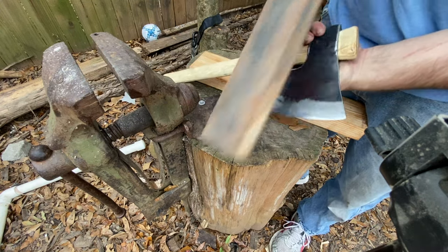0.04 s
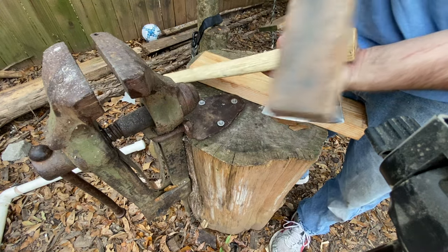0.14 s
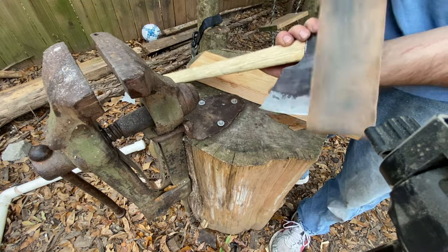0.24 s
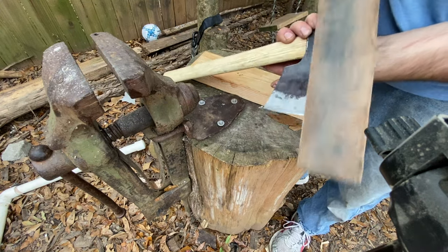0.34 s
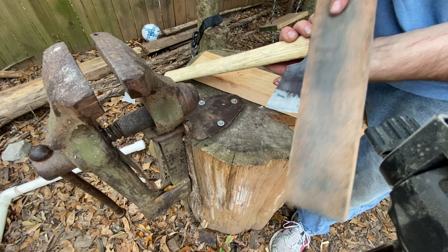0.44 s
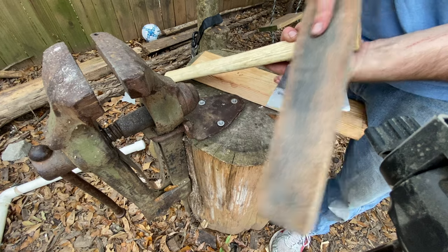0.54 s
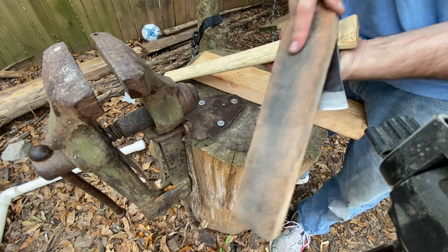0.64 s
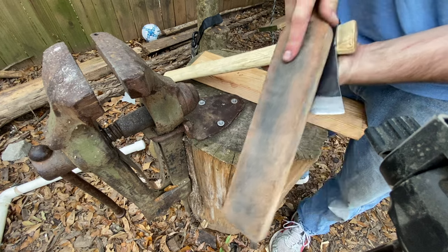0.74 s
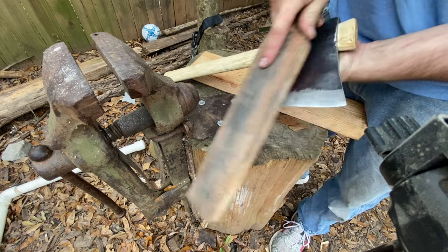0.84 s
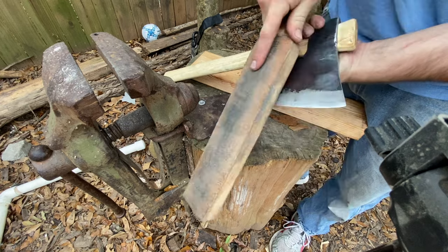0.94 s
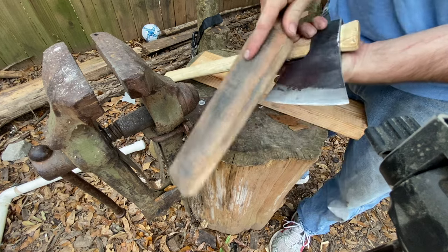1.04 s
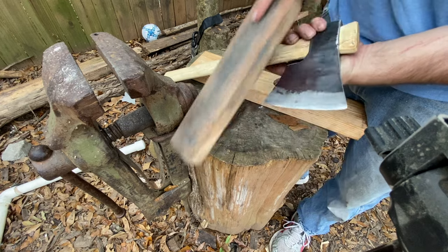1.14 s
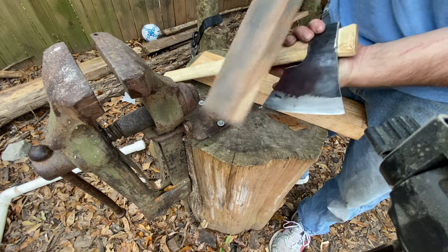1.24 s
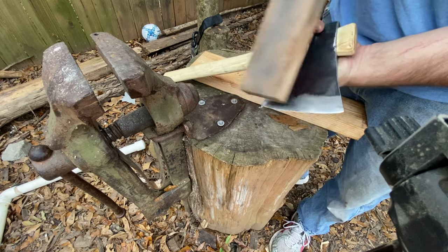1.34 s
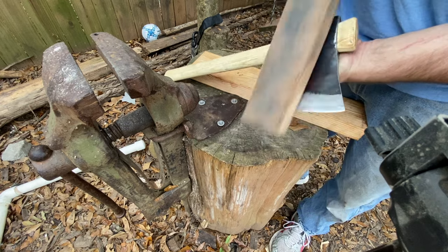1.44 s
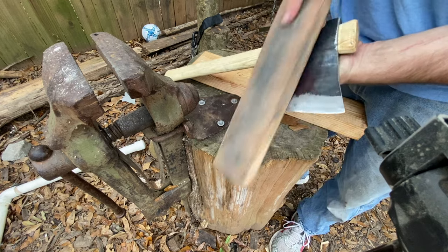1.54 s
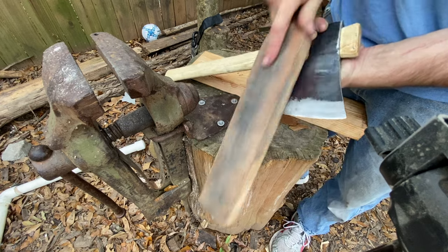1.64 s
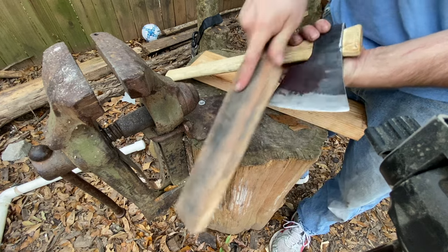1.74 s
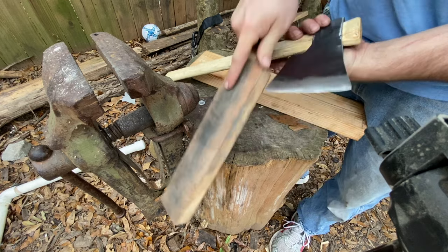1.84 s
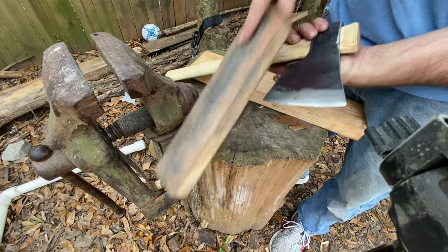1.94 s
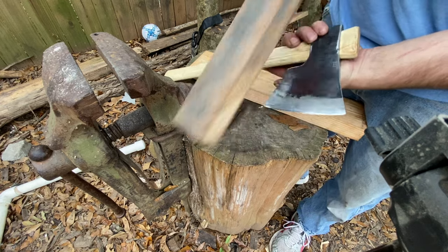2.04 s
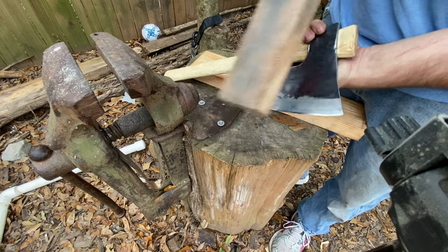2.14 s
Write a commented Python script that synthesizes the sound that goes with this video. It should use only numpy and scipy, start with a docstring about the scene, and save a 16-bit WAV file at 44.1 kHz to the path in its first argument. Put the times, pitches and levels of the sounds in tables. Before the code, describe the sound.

Close to the microphone, a wooden paddle strops a steel axe twice: each stroke is a woody knock with slight metallic ring, then a quiet, gritty scrape. A faint ping ends it, over soft cloth rustle and outdoor rumble.

```python
"""An axe bit is stropped twice with a wooden paddle, outdoors and close to the microphone.
Over the low rumble of the yard, grit ticks and a sleeve rustles on the left as the arm swings.
At 0.24 s the paddle lands with a chattering knock that rings wood and steel, then hisses along the edge.
The sleeve swishes, and at 1.38 s the paddle lands for a second stroke.
At 1.75 s the edge slips off the paddle and the freed bit pings."""
import sys
import numpy as np
from scipy import signal
from scipy.fft import rfft, irfft, next_fast_len
from scipy.io import wavfile
from scipy.ndimage import map_coordinates

SR = 44100
rng = np.random.default_rng(int(sys.argv[2]) if len(sys.argv) > 2 else 0)


def log_audio(samples):
    """Write samples as a 16-bit WAV file to the path given in sys.argv[1]."""
    # one column per channel
    frames = np.atleast_2d(samples).T
    # limit to full scale, then quantise
    limited = np.clip(frames, -1, 1)
    pcm = np.round(limited * 32767).astype(np.int16)
    wavfile.write(sys.argv[1], SR, pcm)


N = 97020
RING_SAMPLES, CONTACT_RISE_S = SR // 3, 0.00084

# modes of the axe head: (frequency [Hz])
STEEL_HZ = [1365, 2162, 2362, 2785, 3768, 3925, 7205, 9078, 11228]
# for each of these modes: (t60 [s], gain when struck [dB], when rubbed [dB], when freed [dB])
STEEL_MODES = [(0.47, -21, -21, -22), (0.048, -35.5, -10, -23), (0.05, 1.5, -4, 2), (.055, -14, -1, -6),
               (.08, -13.5, -8, -32), (0.15, -23, -9, -16), (0.12, -15, -3, -14.5), (.26, -22, -5, -38),
               (0.2, -28, -5.5, -15)]


def amp(db):
    return 10 ** (np.asarray(db) / 20)


def unit(x):
    return x / np.sqrt(np.mean(x ** 2) + 1e-20)


def along(points, hz):
    """Read (frequency [Hz], value) points on a log frequency axis."""
    freqs, values = np.transpose(points)
    return np.interp(np.log(hz + 1), np.log(freqs + 1), values)


def curve(points):
    """Join (time [s], value) points, one value per sample."""
    return np.interp(np.arange(N) / SR, *np.transpose(points))


def wobble(rate):
    """A smooth random curve with rate knots a second."""
    return map_coordinates(rng.standard_normal(N // 8), [np.arange(N) * rate / SR], mode="wrap")


def pan(db):
    """Stereo gains with the left db above the right."""
    return amp(np.array([[db], [-db]]) / 2)


def filtered(x, response):
    """Filter x by a response given as a function of frequency."""
    n = x.shape[-1]
    padded = next_fast_len(n + SR // 10, True)
    return irfft(rfft(x, padded) * response(np.fft.rfftfreq(padded, 1 / SR)), padded)[..., :n]


def noise(colour, alike, size=N):
    """Coloured stereo noise of rms 1; alike is the correlation of left and right."""
    mid, side = filtered(rng.standard_normal((2, size)), lambda hz: amp(along(colour, hz)))
    angle = np.arccos(alike) / 2
    mid, side = np.cos(angle) * mid, np.sin(angle) * side
    return unit(np.array([mid + side, mid - side]))


def since(lag_ms=0):
    """Seconds since a contact reached each channel; a positive lag delays the left."""
    delay_s = np.maximum([[lag_ms], [-lag_ms]], 0) / 1000
    return np.maximum(np.arange(RING_SAMPLES) / SR - delay_s, 0)


def fade(t, t60, rise_s):
    """Quick attack, exponential decay."""
    return -np.expm1(-t / rise_s) * np.exp(-np.log(1000) * t / t60)


def ring(t, hz, t60):
    """One struck mode, building up over about a quarter cycle."""
    return np.sin(2 * np.pi * hz * t) * fade(t, t60, rise_s=0.25 / hz)


def softened(hz, bright_hz):
    """How hard a contact drives a mode: it rolls off above bright_hz."""
    return 1 / np.hypot(1, (hz / bright_hz) ** 2)


def add(out, start_s, sound):
    """Mix in a one-shot."""
    part = out[:, round(start_s * SR):][:, :RING_SAMPLES]
    part += sound[:, :part.shape[1]]


def outdoors():
    """The bed: distant low rumble and soft, gently wavering air."""
    # rumble spectrum: (frequency [Hz], gain [dB])
    rumble_colour = [(12, -52), (20, -39), (36, -10.5), (64, 0.5), (109, 0.5), (129, -6.5), (157, -9.5),
                     (173, -14.5), (201, -14), (260, -23.5), (340, -46), (570, -120)]
    # air spectrum: (frequency [Hz], gain [dB])
    air_colour = [(150, -5), (260, -1), (420, -3.5), (650, -1.5), (1300, -6.5), (1800, -13), (3000, -18.5),
                  (6000, -28), (14000, -85)]
    faint_band = [(400, -120), (570, -42), (900, -120)]  # top end of the rumble
    rumble = noise(rumble_colour[:-1] + faint_band, alike=0.9) * pan(db=1.2)
    air = noise(air_colour, alike=0.13) * pan(db=3.5)
    return amp(-45) * rumble + amp(-55 + 0.82 * wobble(7.13)) * air


def sleeve():
    """Cloth rustles on the left throughout and swishes when the arm turns."""
    # continuous rustle: (time [s], level [dB])
    rustle = [(0, -64.5), (.3, -57), (.5, -61.5), (.72, -62.5), (.95, -61), (1.2, -59.5), (1.55, -56),
              (1.8, -61), (1.93, -64.5), (2.2, -56)]
    # swishes: (peak time [s], width [s], level [dB])
    swishes = [(0.151, .012, -48.5), (.195, 0.0067, -58), (.58, 0.031, -55), (1.028, 0.018, -50),
               (1.07, 0.039, -51), (1.33, 0.037, -65), (1.66, 0.044, -57), (2.17, 0.03, -70)]
    # cloth spectrum: (frequency [Hz], gain [dB])
    cloth_colour = [(500, -2), (2500, -1.5), (4000, -0.5), (7200, 4), (8600, -1), (10000, -8), (15000, -44)]
    t = np.arange(N) / SR
    swish_power = sum(amp(db) ** 2 * np.exp(-((t - s) / width) ** 2) for s, width, db in swishes)
    envelope = np.sqrt(amp(curve(rustle)) ** 2 + swish_power)
    cloth = unit(noise(cloth_colour, alike=0.32) * amp(2.2 * wobble(490) + 0.82 * wobble(40.9)))
    return cloth * envelope * amp([[0], [-17]])


def ticks():
    """Grit and light touches make brief scratches, some dull and some crisp."""
    # scratches: (time [s], level [dB], t60 [s], left over right [dB], tilt [dB/octave])
    scratches = [(0.0376, -39, 0.028, 7, -5), (.064, -51, .08, 10.5, -1.5), (.835, -48, .1, 1, 3),
                 (1.2655, -45, 0.042, 9.5, 3), (1.532, -41, 0.039, 0, 13), (1.657, -43, 0.038, -3, -1.5),
                 (1.753, -40.5, 0.026, 7, -12.5), (2.195, -53, 0.18, -4, 1)]
    # grit spectrum before the tilt: (frequency [Hz], gain [dB])
    grit_colour = [(200, -3), (700, 12), (1300, 12.5), (2000, 7.5), (3500, 8.5), (5000, 2.5), (9000, -8),
                   (15000, -16.5)]
    out = np.zeros((2, N))
    for s, db, t60, side, tilt in scratches:
        colour = [(hz, gain + tilt * np.log2(hz)) for hz, gain in grit_colour]
        grit = noise(colour, alike=0.25, size=RING_SAMPLES)
        add(out, s, amp(db) * pan(side) * grit * fade(since(), t60, CONTACT_RISE_S))
    return out


def paddle(t, place, bright_hz):
    """The wood rings according to where it is struck; neighbouring modes swing in opposite senses."""
    # wood modes: (frequency [Hz], t60 [s], gain at tip [dB], gain at middle [dB], left over right [dB])
    wood_modes = [(156, 0.054, -14, -33, 1), (326, 0.054, -13, -24, 3.5), (430, 0.016, -7, -27.5, 4),
                  (542.4, 0.036, -14.5, -6.5, 5), (674, 0.054, -16, -18.5, -11),
                  (699, 0.011, -19.5, 0.5, 11), (1000, .05, -28, -28, -8), (1010, 0.0065, 4, -14.5, 1),
                  (1267, 0.031, -4.5, -5.5, -5), (1356, 0.063, -16, -28.5, 17),
                  (1504, 0.015, -27.5, -13, 3), (2003, 0.031, -37, -18, -4), (2550, 0.01, -43, -14.5, 7)]
    out = np.zeros_like(t)
    for k, (hz, t60, tip, middle, side) in enumerate(wood_modes):
        drive = amp(tip + place * (middle - tip)) * softened(hz, bright_hz)
        out += (-1) ** k * drive * pan(side) * ring(t, hz, t60)
    return out


def knocks():
    """The paddle lands and chatters: each contact cracks and rings wood and steel; soft ones are dull."""
    # paddle meets bit: (time [s], gain [dB], brightness [Hz], place [0 tip, 1 middle],
    # steel ring gain [dB], left lag [ms])
    contacts = [(0.2405, 0, 3000, 0, -14.5, 0.091), (.2432, -5, 600, 0.084, -6, 0.3),
                (0.249, -7.5, 650, 0.78, -15, .05), (0.26, -13, 1900, 0.052, -16, .1),
                (0.2625, -17, 700, 0, -25, 0.038), (1.3765, -17, 9140, 0.4, -19.5, 0.092),
                (1.3783, -2, 2330, 0.9, -40, 0.24)]
    # spectrum of the contact's crack: (frequency [Hz], gain [dB])
    crack_colour = [(200, 14), (1500, 20.5), (3000, 14), (4300, -20), (5600, -12), (10000, -6.5),
                    (15000, -25)]
    # clack of dense, short-lived wood modes: (frequency [Hz], gain [dB])
    clack_colour = [(60, 1.5), (300, 2.5), (750, -2.5), (1300, -1), (1650, -15), (3000, -22), (4300, -33.5),
                    (6000, -26.5), (14000, -54)]
    out = np.zeros((2, N))
    head_modes = np.array([amp(struck) * ring(since(lag_ms=-0.099), hz, t60)
                           for hz, (t60, struck, _, _) in zip(STEEL_HZ, STEEL_MODES)])
    for s, db, bright_hz, place, steel_db, lag_ms in contacts:
        t = since(lag_ms)
        steel = amp(steel_db) * np.tensordot(softened(np.array(STEEL_HZ), bright_hz), head_modes, axes=1)
        crack = noise(crack_colour, alike=0.53, size=RING_SAMPLES) * fade(t, 0.0096, CONTACT_RISE_S)
        clack = noise(clack_colour, alike=1.0, size=RING_SAMPLES) * fade(t, t60=0.082, rise_s=0.00038)
        # a blow at the middle stirs both less than one at the tip
        crack *= amp(-14.5 - 5 * place) * (bright_hz / 2500) ** 2
        clack *= amp(-19 - 9 * place)
        add(out, s, amp(db) * (paddle(t, place, bright_hz) + steel + clack + crack))
    return out


def stroke():
    """The paddle slides along the edge: fine grainy friction, which makes the steel sing faintly."""
    # friction envelope: (time [s], level [dB])
    slide = [(0, -85), (.23, -65.5), (.25, -54.5), (.4, -61), (.57, -60), (.72, -70), (.77, -60),
             (.81, -61.5), (.84, -57), (.89, -66), (1.36, -69), (1.385, -55.5), (1.43, -57.5),
             (1.49, -54.5), (1.62, -60.5), (1.67, -60.5), (1.76, -59.5), (1.82, -83.5), (2.2, -68.5)]
    # friction spectrum: (frequency [Hz], gain [dB])
    hiss_colour = [(300, -14), (1500, -0.5), (3000, -4.5), (4500, 1.5), (6500, -4.5), (10500, 2.5),
                   (12500, -12.5), (15500, -4.5)]
    grain = unit(noise(hiss_colour, alike=0.133) * amp(2 * wobble(700) + 2.2 * wobble(33.67)))
    friction = grain * amp(curve(slide))
    singing = np.std(friction) * unit(filtered(friction, rubbed_steel))
    return friction + amp(-8.5) * singing


def rubbed_steel(hz):
    """Response of the axe head to rubbing: one band per mode, narrower the longer it rings."""
    response = 0
    for mode_hz, (t60, _, rubbed, _) in zip(STEEL_HZ, STEEL_MODES):
        width_hz = np.log(1000) / np.pi / t60
        damping = 1j * hz * width_hz
        response += amp(rubbed) * damping / (mode_hz ** 2 - hz ** 2 + damping)
    return response


def ping():
    """The freed bit rings, and the paddle gives a small tock."""
    # the edge slips off the paddle: (time [s], gain [dB])
    slips = [(1.7533, -38)]
    out, t = np.zeros((2, N)), since(lag_ms=0.028)
    steel = sum(amp(freed) * ring(t, hz, t60) for hz, (t60, _, _, freed) in zip(STEEL_HZ, STEEL_MODES))
    tock = amp(1) * paddle(t, place=1.0, bright_hz=1090)
    for s, db in slips:
        add(out, s, amp(db) * (steel + tock))
    return out


def yard(x):
    """A short reverb tail from fence and ground."""
    # decay of the tail: (frequency [Hz], t60 [s])
    decay_times = [(150, 0.15), (1300, 0.46), (4000, .25), (12000, 0.11)]
    hz, t, spectrum = signal.stft(rng.standard_normal((2, SR // 2)), SR, nperseg=256)
    decay = np.exp(-np.log(1000) * t / along(decay_times, hz)[:, None])
    _, tail = signal.istft(spectrum * decay, SR, nperseg=256)
    return signal.fftconvolve(x, tail / np.linalg.norm(tail[0]), axes=1)[:, :N]


def scene():
    """The close sounds and their faint tail over the outdoor bed."""
    close = knocks() + ping() + ticks() + stroke() + sleeve()
    return close + amp(-30.5) * yard(close) + outdoors()


def record(dry):
    """Soft-clip the highest peaks and cut the extreme treble."""
    ceiling, top_hz = 0.95, 15500
    rounded = dry / (1 + np.abs(dry / ceiling) ** 8) ** (1 / 8)
    return filtered(rounded, lambda hz: hz < top_hz)


dry = scene()
out = record(dry)
log_audio(out)
```